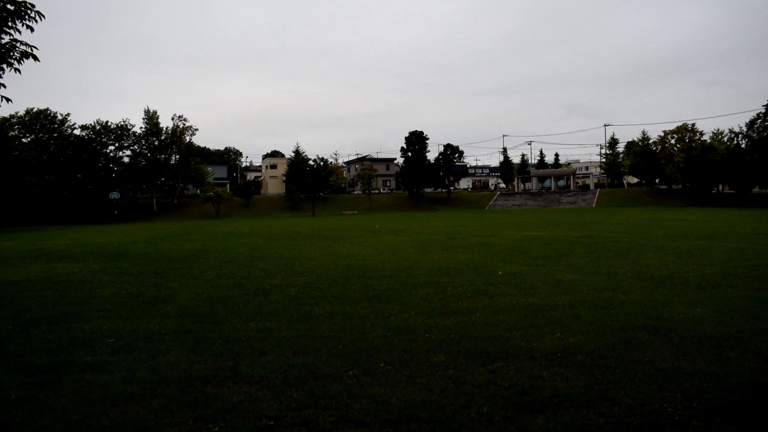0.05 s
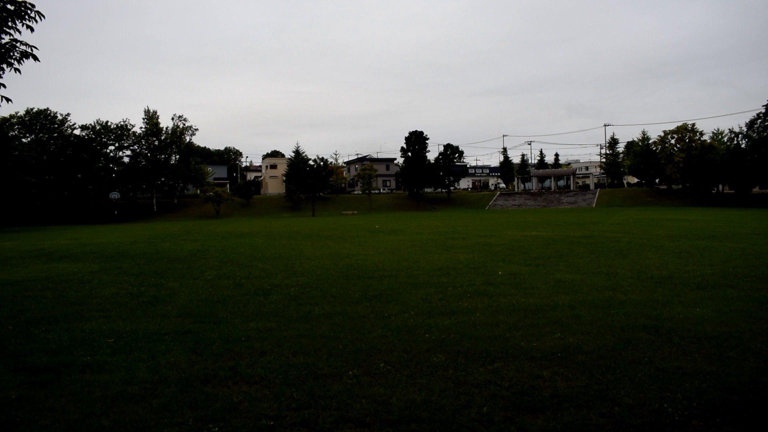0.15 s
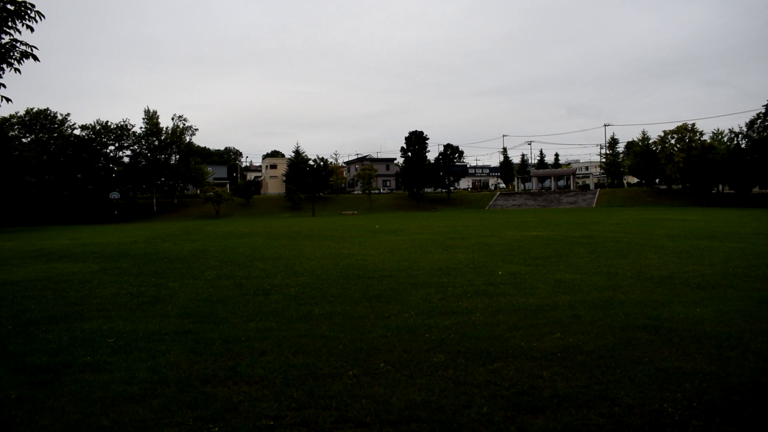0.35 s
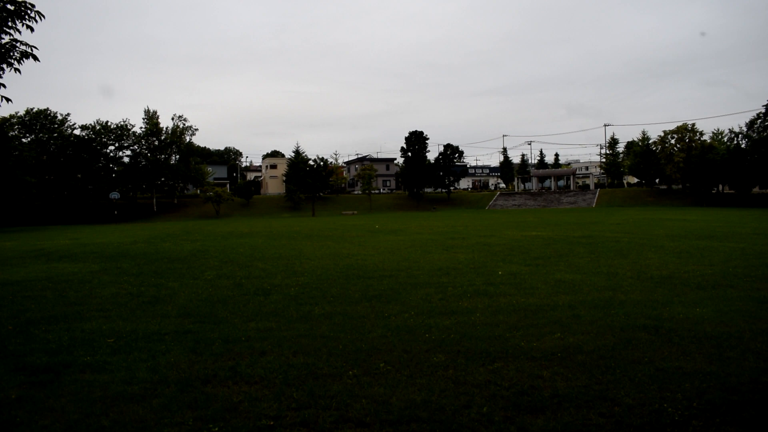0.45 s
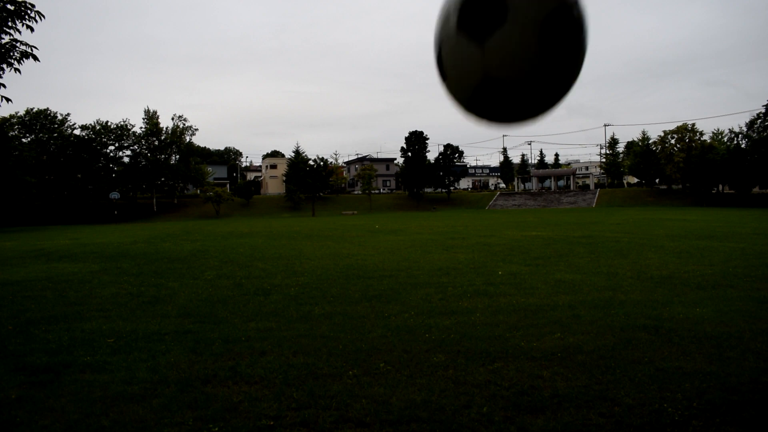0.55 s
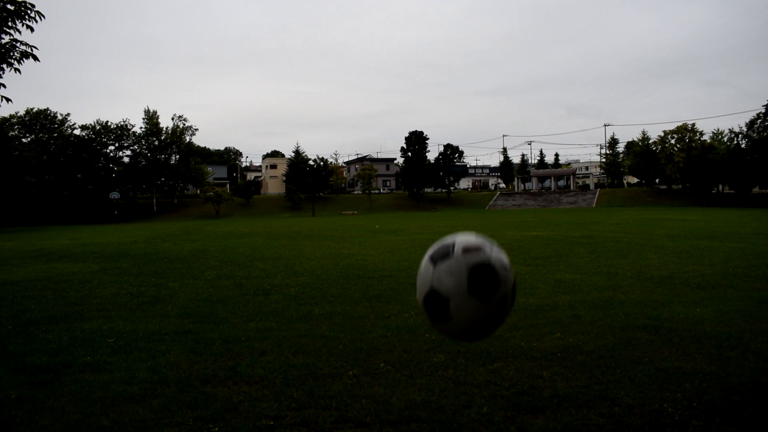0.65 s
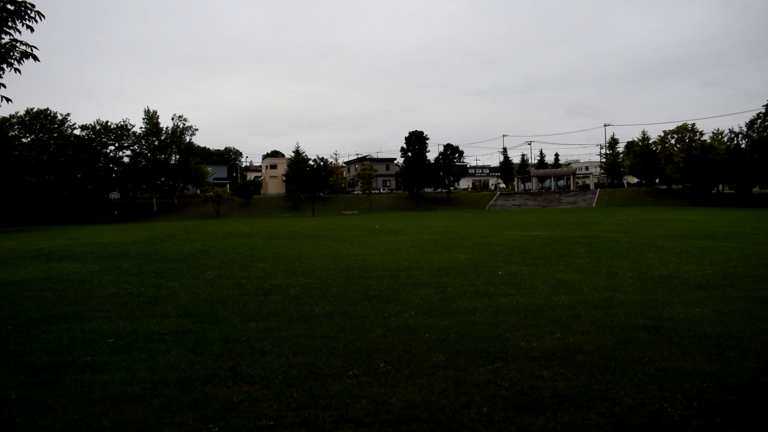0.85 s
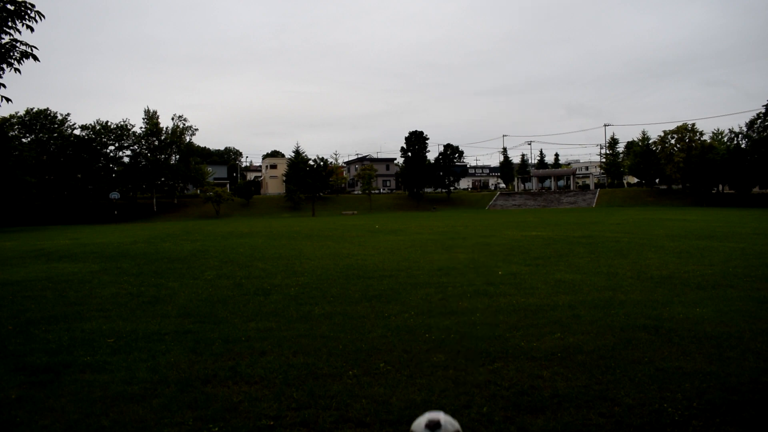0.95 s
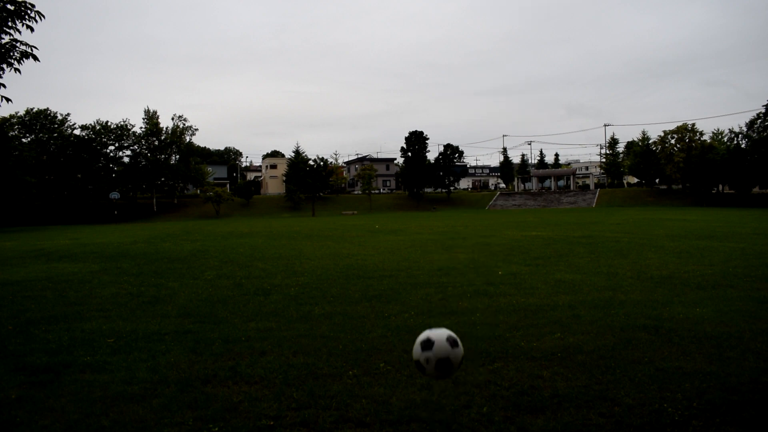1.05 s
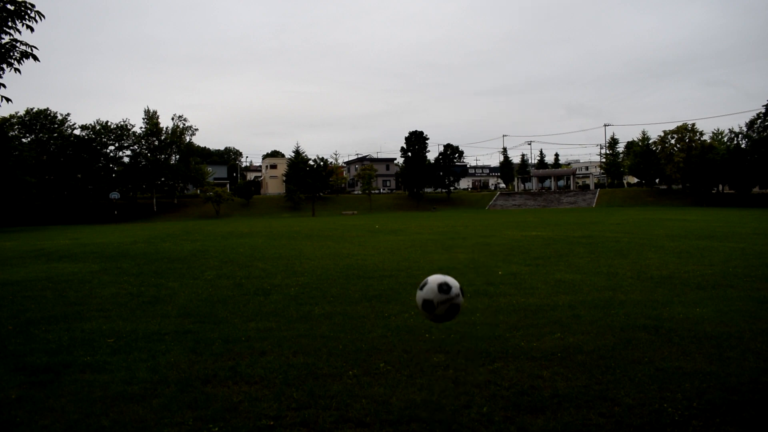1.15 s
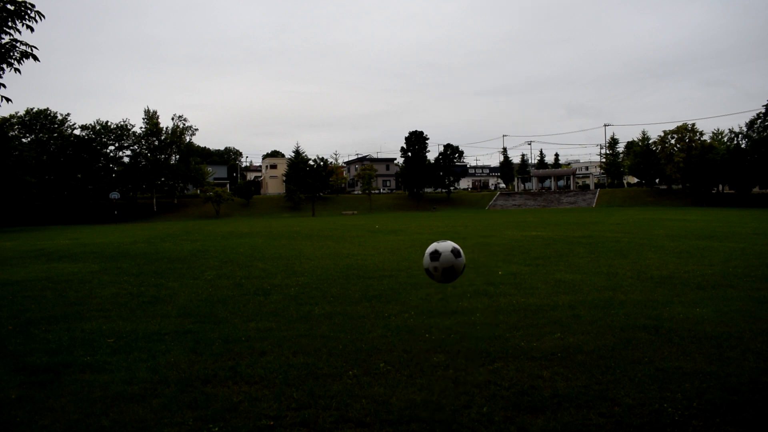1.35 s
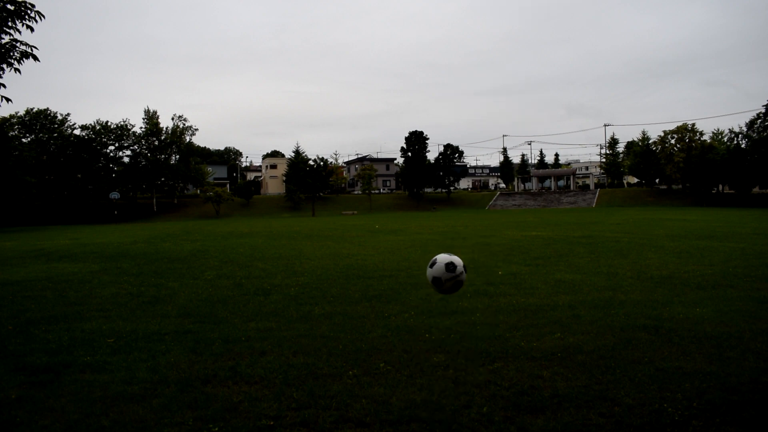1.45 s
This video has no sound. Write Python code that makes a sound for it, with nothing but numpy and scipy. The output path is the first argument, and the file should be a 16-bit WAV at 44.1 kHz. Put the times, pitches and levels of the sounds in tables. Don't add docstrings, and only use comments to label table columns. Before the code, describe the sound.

Close soccer kick with a sharp slap and grass scuff, then one soft bounce on turf

```python
import sys
import numpy as np
from scipy import signal
from scipy.fft import rfft, irfft, next_fast_len
from scipy.io import wavfile
from scipy.ndimage import uniform_filter1d, map_coordinates

SR = 44100
rng = np.random.default_rng(int(sys.argv[2]) if len(sys.argv) > 2 else 0)


def bounce(signal):
    frames = np.transpose(np.atleast_2d(signal))
    limited = np.clip(frames, -1, 1)
    pcm = np.round(limited * 32767).astype(np.int16)
    wavfile.write(sys.argv[1], SR, pcm)


def gain_from_db(level_db):
    decades = np.asarray(level_db, float) / 20
    return 10 ** decades


N = 66150


def unit(x):
    return x / np.sqrt(np.mean(x ** 2) + 1e-20)


def along(points, hz):
    point_hz, value = np.transpose(points)
    return np.interp(np.log(hz + 1), np.log(point_hz + 1), value)


def wobble(rate):
    knots = rng.standard_normal(int(N * rate / SR) + 4)
    return map_coordinates(knots, [np.arange(N) * rate / SR])


def filtered(x, response):
    n = x.shape[-1]
    padded = next_fast_len(2 * n)
    return irfft(rfft(x, padded) * response(np.fft.rfftfreq(padded, 1 / SR)), padded)[..., :n]


def swell(rows):
    t = np.arange(N) / SR
    total = 0
    for start, rise, t60, db in rows:
        fade = gain_from_db(db - 60 * np.maximum(t - start - rise, 0) / t60)
        total = total + fade * np.clip((t - start) / rise, 0, 1) ** 2
    return total


def grit(spectrum, rate, spread_db, smooth):
    happens = rng.random(N) < rate / SR
    size = gain_from_db(spread_db * rng.standard_normal(N).clip(-2, 1.5))
    clicks = happens * size * rng.choice([-1, 1], N)
    mix = np.sqrt(1 - smooth) * unit(clicks) + np.sqrt(smooth) * rng.standard_normal(N)
    return unit(filtered(mix, lambda hz: gain_from_db(along(spectrum, hz))))


def rush(spectrum, patchy_db):
    # pitch_hz, likeness (0 to 1)
    alike = [(40, .8), (150, .99), (550, .99), (1650, .95), (3500, .86), (6500, .78), (8000, .93),
             (15000, .94)]
    z = signal.stft(rng.standard_normal((2, N)), nperseg=512)[2]
    patches = uniform_filter1d(rng.standard_normal(z.shape[1:]), 6, axis=0)
    patches = uniform_filter1d(patches, 10, axis=1)
    pair = signal.istft(z * gain_from_db(patchy_db * unit(patches)), nperseg=512)[1][:, :N]

    def mid_side(hz):
        angle = np.arccos(np.clip(along(alike, hz), -1, 1)) / 2
        return gain_from_db(along(spectrum, hz)) * [np.cos(angle), np.sin(angle)]

    mid, side = filtered(pair, mid_side)
    return unit(np.array([mid + side, mid - side]))


def traffic():
    # pitch_hz, level_db
    hiss_colour = [(300, -40), (450, -14), (650, -6), (900, -1), (1900, -3.5), (3200, -11.5), (5840, -24),
                   (16000, -46)]
    rumble_colour = [(20, -14), (40, -8), (60, -12), (110, -5), (230, -5), (320, -13), (450, -14),
                     (800, -60)]
    hiss = gain_from_db(-43 + .5 * wobble(2) + .4 * wobble(10)) * rush(hiss_colour, patchy_db=1.0)
    return hiss + gain_from_db(-58.5 + .6 * wobble(4)) * rush(rumble_colour, patchy_db=.8)


def rustles():
    # start_s, rise_s, t60_s, level_db
    stirs = [
        (0.0, .05, 2.0, -68),
        (.28, .01, .5, -58),
        (.395, .02, .35, -56),
        (.52, .2, 1.5, -64),
        (.8, .1, 1.0, -64),
        (.925, .008, .6, -58),
        (1.415, .02, .3, -62),
    ]
    # pitch_hz, level_db
    blades = [(1500, -60), (3000, -8), (6500, 0), (10000, -2), (16000, -13)]
    return swell(stirs) * grit(blades, rate=1200, spread_db=5, smooth=.6)


def cracks():
    # start_s, level_db, pitch_hz (centre), t60_s
    hits = [(.2255, -33, 2500, .012), (.2285, -24, 10500, .025), (.2283, -28, 1400, .05),
            (.2292, -21, 4000, .04), (.2357, -17, 8000, .005), (.2415, -10, 3700, .012),
            (.2424, -15, 7000, .014), (.2426, -14, 3900, .016), (.2437, -9, 1900, .011),
            (.2483, -22, 9000, .01), (.249, -21, 1600, .02), (.2527, -20, 9500, .02),
            (.2555, -21, 2600, .025), (.261, -21, 1500, .04), (.2665, -28, 9500, .012),
            (.2935, -42, 9000, .015), (.308, -42, 9000, .025), (.3645, -48, 9000, .03),
            (.368, -47, 10000, .025), (.39, -51, 11000, .012), (.4, -36, 5000, .03),
            (.407, -47, 10000, .015), (.421, -47.5, 9000, .05), (.434, -49, 8000, .03),
            (.554, -60, 10000, .03), (.8935, -36, 2000, .015), (.9275, -45, 6000, .02),
            (.932, -26, 1700, .016), (.941, -45, 6000, .02), (1.274, -57, 6500, .06)]
    width, rise_s = .8, .0002
    snap = 4.5
    out, t = np.zeros(N + SR), np.arange(4096) / SR
    noises = rng.standard_normal((len(hits), len(t)))
    for (start, db, centre, t60), noise in zip(hits, noises):
        def band(hz):
            spread = 1j * hz * centre * width
            return (spread / (centre * centre - hz * hz + spread)) ** 2

        shape = gain_from_db(db - 60 * t / t60) * (1 - np.exp(-t / rise_s))
        burst = filtered(shape * noise - snap * gain_from_db(db) * (t == 0), band)
        out[round(start * SR):][:len(t)] += unit(burst) * np.sqrt(np.mean(shape ** 2))
    return out[:N]


def scuffs():
    # start_s, rise_s, t60_s, level_db
    brushes = [
        (.226, .004, .12, -31),
        (.241, .004, .17, -24.5),
    ]
    # pitch_hz, level_db
    torn = [(180, -51), (300, -21), (701, -7), (1610, -3), (2650, -2), (6740, -13), (10600, -11),
            (16000, -28)]
    return swell(brushes) * grit(torn, rate=2500, spread_db=5, smooth=.45)


def sole_drag():
    # start_s, rise_s, t60_s, level_db
    scrapes = [
        (.228, .003, .15, -35),
        (.25, .02, .4, -36),
        (.385, .02, .3, -47),
    ]
    # pitch_hz, level_db
    sole = [(200, -40), (400, -4), (1000, 0), (2000, -2), (3800, -6), (6000, -16), (16000, -36)]
    return swell(scrapes) * grit(sole, rate=2500, spread_db=5, smooth=.45)


def crushed_grass():
    # start_s, rise_s, t60_s, level_db
    touch = (.927, .005, .14, -28)
    # pitch_hz, level_db
    crush = [(200, -40), (450, -5), (1100, 0), (2000, -3), (4000, -17), (9000, -30), (16000, -45)]
    return swell([touch]) * grit(crush, rate=1200, spread_db=4, smooth=.5)


def landing():
    # start_s, level_db, direction (+1 or -1), pitch and decay (times those of the first)
    pushes = [
        (.9353, -5, -1, 1.0, 1.0),
        (.9415, -13, 1, 1.45, .5),
        (.9485, -27, -1, 1.1, 1.6),
        (.9565, -30, 1, 1.0, 1.6),
    ]
    # pitch_hz, level_db, t60_s
    tones = [(575, -3, .02), (430, -4, .012), (280, -9.5, .014), (150, -14, .032), (850, -8, .006),
             (1600, -16, .008)]
    rise_s = .0003
    t, out = np.arange(N) / SR, 0
    for start, db, way, pitch, last in pushes:
        since = np.maximum(t - start, 0)
        rise = 1 - np.exp(-since / rise_s)
        for hz, level_db, t60 in tones:
            fade = gain_from_db(db + level_db - 60 * since / (t60 * last))
            out = out + way * fade * np.sin(2 * np.pi * hz * pitch * since) * rise
    return out


def lawn(x):
    t60_s, level_db = .12, -21
    t = np.arange(SR // 4) / SR
    tail = rng.standard_normal(len(t)) * gain_from_db(-60 * t / t60_s) * (t > .006)
    return x + gain_from_db(level_db) * signal.fftconvolve(x, tail / np.linalg.norm(tail))[:N]


def near(x):
    # pitch_hz, level_db
    lean_curve = [(1000, 0.0), (4000, -.5), (9000, -3.2), (14000, -.3)]
    # pitch_hz, level_db
    side_curve = [(300, -34), (2500, -30), (3800, -13), (6000, -17), (10000, -14), (16000, -11)]
    low_cut_hz = 76

    def ports(hz):
        lean = gain_from_db(along(lean_curve, hz) / 2)
        side = 1j * gain_from_db(along(side_curve, hz))
        cut = (1j * hz / (low_cut_hz + 1j * hz)) ** 3
        return cut * np.array([lean * (1 + side), (1 - side) / lean])

    return filtered(x, ports)


def scene():
    background = traffic()
    grass = rustles()
    kick = cracks() + scuffs() + sole_drag()
    fall = crushed_grass() + lawn(landing())
    return background + near(grass + kick + fall)


def top_cut(x):
    return signal.sosfilt(signal.butter(12, 16990, fs=SR, output="sos"), x)


def record(dry):
    top_hz, edge_hz, offset = 15800, 500, -.0029
    mix = filtered(dry, lambda hz: np.clip((top_hz - hz) / edge_hz, 0, 1)) + offset
    return top_cut(mix)


dry = scene()
out = record(dry)
bounce(out)
```